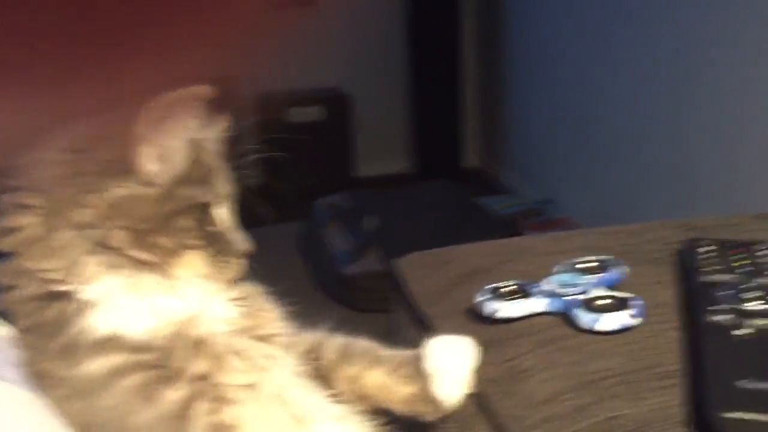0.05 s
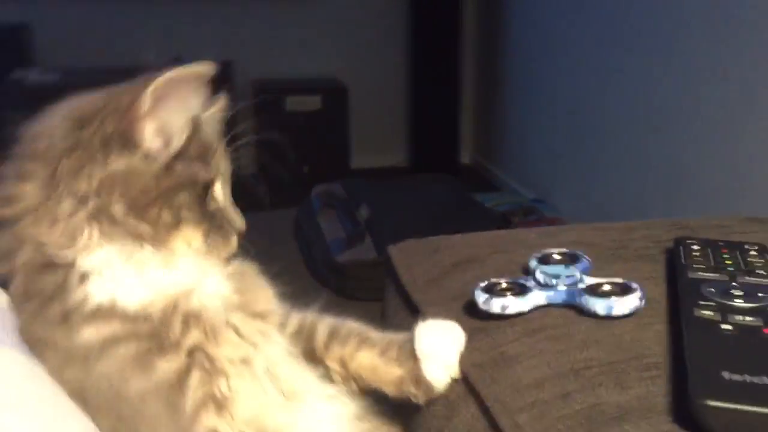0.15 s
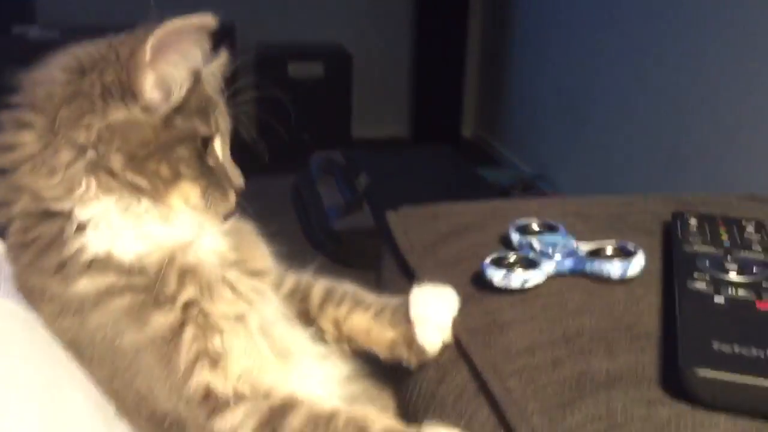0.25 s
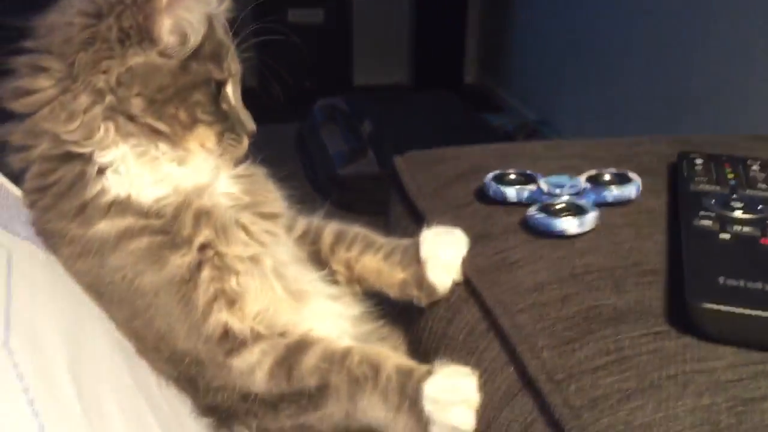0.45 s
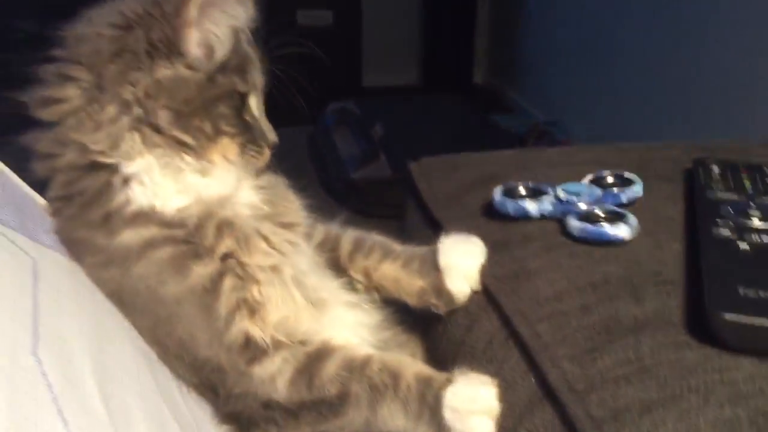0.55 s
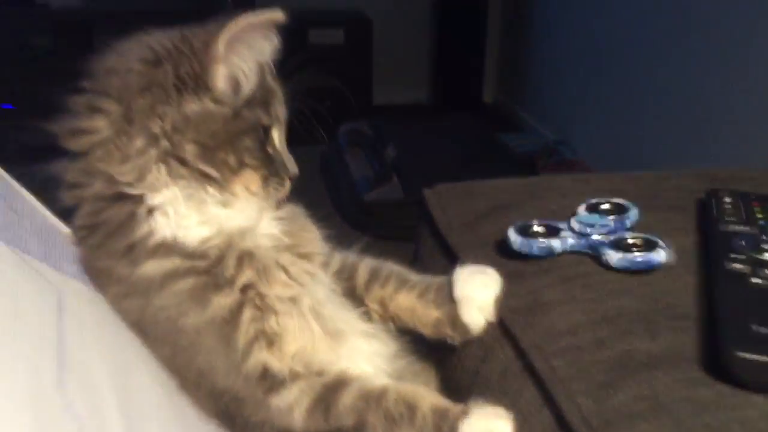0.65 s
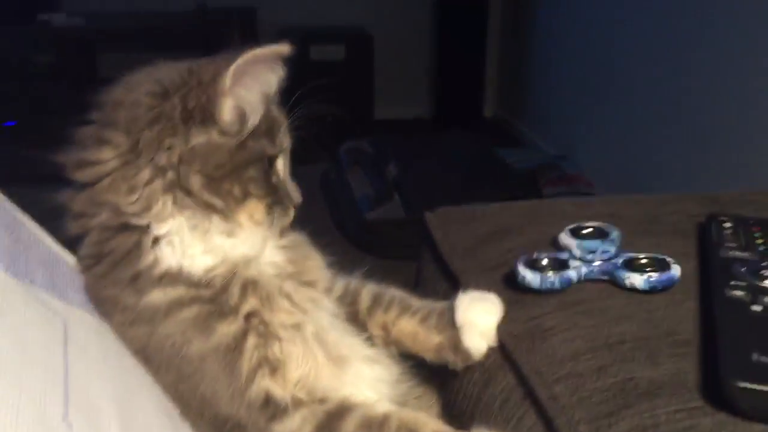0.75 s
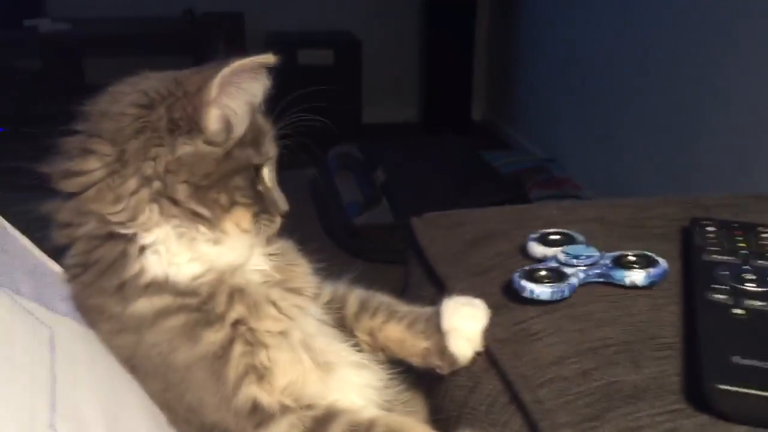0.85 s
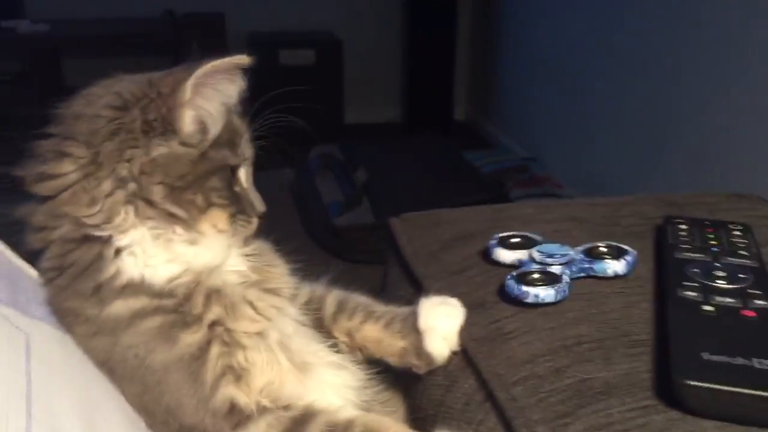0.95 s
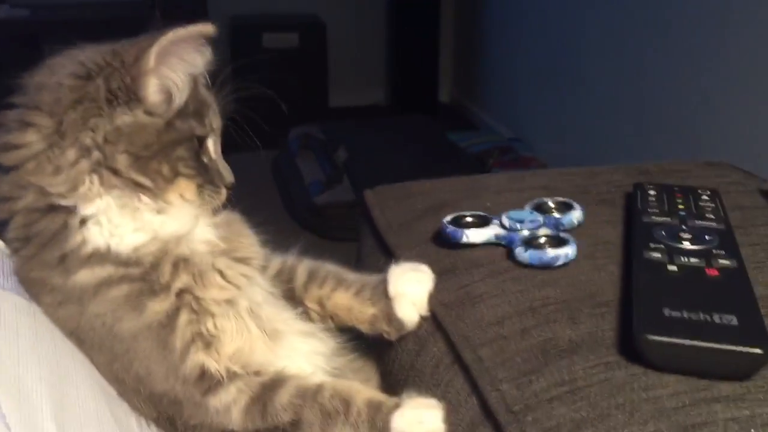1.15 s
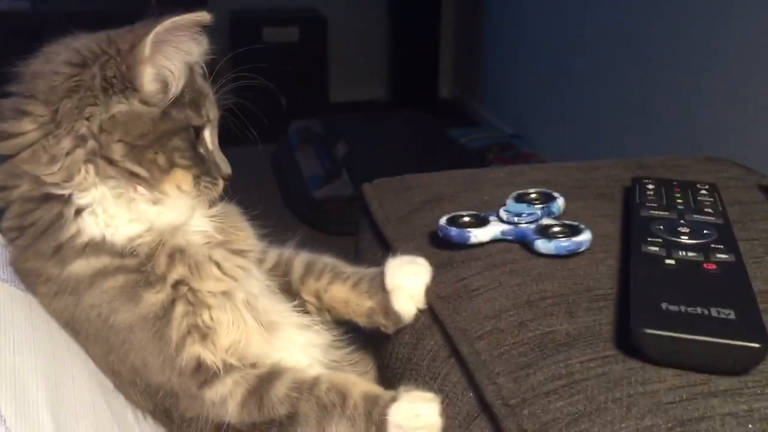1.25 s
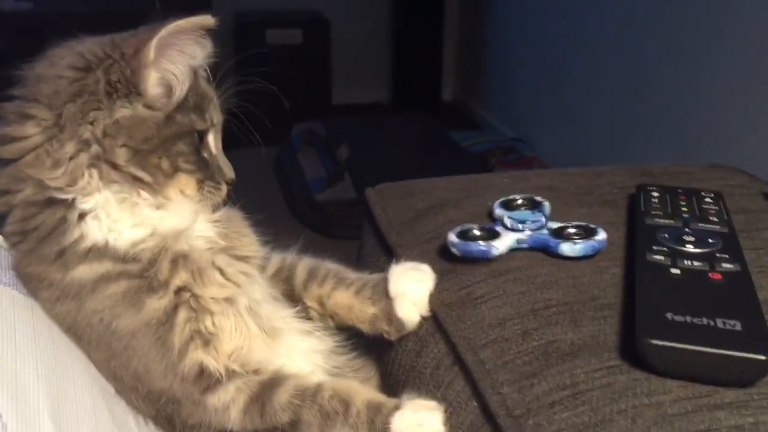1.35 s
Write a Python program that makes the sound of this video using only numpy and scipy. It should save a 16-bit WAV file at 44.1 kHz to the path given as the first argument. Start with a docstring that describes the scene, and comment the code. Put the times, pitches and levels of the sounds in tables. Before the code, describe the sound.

Two dry, close knocks come from fingers bumping a small hand-held case. The first, at about 0.25 seconds, is a quick cluster of contacts with a sharp tick and a low thud. The second, at about 0.8 seconds, is shorter and slightly softer. Skin rubs very faintly around both. There is almost no echo, and soft room hiss and low rumble continue throughout.

```python
"""Two dry, close knocks in a quiet room, most likely fingers bumping a small hand-held case.
Each knock is a quick cluster of contacts ringing well-damped modes, with light ticks on top
and low thuds as the case rocks in the grip.
Skin rubs faintly around the knocks; soft room rumble and hiss lie underneath."""
import sys
import numpy as np
from scipy import signal
from scipy.fft import rfft, irfft
from scipy.io import wavfile

SR = 44100
rng = np.random.default_rng(int(sys.argv[2]) if len(sys.argv) > 2 else 0)


def put_to_file(sound):
    """Save the sound as 16-bit audio at rate SR, in the file named by the first command-line argument."""
    columns = np.atleast_2d(sound).T  # one column per channel
    safe = np.clip(columns, -1, 1)
    whole_steps = np.round(safe * 32767)
    wavfile.write(sys.argv[1], SR, whole_steps.astype(np.int16))


N = 61739


def from_db(db):
    """Decibels to gain."""
    return 10 ** (np.asarray(db) / 20)


def unit_rms(x):
    """Scale to rms 1."""
    return x / np.sqrt(np.mean(x ** 2) + 1e-20)


def since(start_s):
    """Seconds since start_s, zero before it."""
    return np.maximum(np.arange(N) / SR - start_s, 0)


def decay(t, t60_s):
    """Exponential fall, 60 dB per t60_s."""
    return from_db(-60 * np.minimum(t / t60_s, 5))


def ring(t, pitch_hz, t60_s, swell_cycles=0.39):
    """Damped mode; builds over part of a cycle, so treble arrives first."""
    swell = 1 - np.exp(-t * pitch_hz / swell_cycles)
    return np.sin(2 * np.pi * pitch_hz * t) * swell * decay(t, t60_s)


def filtered(x, corner_hz, kind, order=2):
    """Causal low- or high-pass."""
    return signal.sosfilt(signal.butter(order, corner_hz, kind, fs=SR, output="sos"), x + 1e-18)


def coloured(noise, spectrum):
    """Shape noise to a spectrum; rms 1."""
    freq_hz, level_db = np.transpose(spectrum)
    bins_hz = np.maximum(np.fft.rfftfreq(N, 1 / SR), 1)
    gain = from_db(np.interp(np.log(bins_hz), np.log(freq_hz), level_db))
    return unit_rms(irfft(rfft(noise) * gain, N))


def room_noise(level_db=-66.5, rumble_hz=203, waver_db=2.5, waver_hz=8.6):
    """Steady hiss over a wavering low rumble."""
    # background spectrum: freq_hz, relative_db
    spectrum = [(15, -27), (25, -12), (48, 1.5), (82, -5), (111, -5.5), (142, -5), (246, -3), (332, -11.5),
                (476, -11.5), (531, -15.5), (871, -18.5), (1030, -13), (1470, -21.5), (2350, -21.5),
                (10400, -30.5), (16600, -33.5), (18000, -48)]
    noise = coloured(rng.standard_normal(N), spectrum)
    noise = from_db(level_db) * unit_rms(filtered(noise, 30, "high"))
    waver = unit_rms(filtered(rng.standard_normal(N), waver_hz, "low"))
    rumble = filtered(noise, rumble_hz, "low", order=1)
    return noise + rumble * (from_db(waver_db * waver) - 1)


def thuds():
    """The case rocks for a few cycles against the soft hand."""
    # rocking in the grip: start_s, level_db, pitch_hz, t60_s
    rocks = [(0.136, -50, 133.4, 0.13), (.143, -49.5, 245, 0.055), (0.189, -41, 168, 0.043),
             (.1952, -38, 72.7, 0.12), (0.2361, -23.5, 229.2, 0.046), (.2459, -21.5, 170, 0.033),
             (.2430, -28.5, 59.3, 0.082), (0.328, -51, 52.3, 0.19), (0.7717, -21, 146.5, 0.025),
             (0.7781, -29.5, 71.5, .085), (.986, -54, 250, 0.093), (1.229, -58, 71, 0.18)]
    return sum(from_db(level_db) * ring(since(start_s), pitch_hz, t60_s)
               for start_s, level_db, pitch_hz, t60_s in rocks)


def knocks():
    """Each contact rings the case; softer contacts lose treble, and the grip shifts the pitch."""
    # contacts on the case: start_s, gain_db, corner_hz, pitch_ratio
    contacts = [(.1711, -31, 2500, 1.12), (0.2305, -12.2, 7500, 0.97), (0.233, -16, 5130, 0.92),
                (0.2352, -5.5, 4500, 1.094), (0.239, 0, 2730, 1.05), (0.2427, -3.5, 1620, 0.801),
                (0.2509, 2.1, 13300, 1.033), (0.76, -29, 5000, 0.95), (0.7699, -2.5, 1850, 0.863),
                (0.7712, -5, 5100, .864), (0.7738, -6.5, 5240, 1.013)]
    # case modes: pitch_hz, level_db, t60_s
    modes = [(622.5, -25, 0.022), (734, -25, 0.012), (1155, -25, 0.011), (1905, -17, 0.0023),
             (2400, -23, 0.0049), (3710, -28, 0.0043), (4440, -24.5, 0.0031), (5450, -22.5, .0017),
             (7630, -32, 0.0013), (11600, -37, 0.00086)]
    out = np.zeros(N)
    for start_s, gain_db, corner_hz, pitch_ratio in contacts:
        t = since(start_s)
        ringing = sum(from_db(level_db) * ring(t, pitch_hz * pitch_ratio, t60_s)
                      for pitch_hz, level_db, t60_s in modes)
        out -= from_db(gain_db) * filtered(ringing, corner_hz, "low")  # minus: the case dents inward
    return out


def rubs(slips_per_s=7000, spread_db=4, low_cut_hz=150):
    """Dense tiny slips of skin, swelling and fading with each shift of the fingers."""
    # finger shifts: peak_s, level_db, rise_s, fall_s
    shifts = [(.176, -67.5, .004, 0.01), (.226, -62, 0.044, 0.0018), (0.235, -47, 0.0049, .003),
              (0.281, -63.5, 0.013, 0.013), (.342, -74.5, .008, 0.023), (.767, -58.5, 0.013, 0.0079),
              (0.78, -55, 0.0054, 0.011), (0.821, -70.5, 0.018, 0.018), (.96, -73.5, 0.034, 0.063)]
    # skin friction spectrum: freq_hz, relative_db
    spectrum = [(150, 0), (400, 3), (700, 1.5), (1500, -7), (3000, -9), (6000, -19.5), (10000, -21.5),
                (17000, -32)]
    t = np.arange(N) / SR
    envelope = sum(from_db(level_db) * np.exp(-np.maximum((peak_s - t) / rise_s, (t - peak_s) / fall_s))
                   for peak_s, level_db, rise_s, fall_s in shifts)
    slips = (rng.random(N) < slips_per_s / SR) * rng.choice([-1, 1], N)
    strength = from_db(spread_db * rng.standard_normal(N))
    return envelope * filtered(coloured(slips * strength, spectrum), low_cut_hz, "high")


def ticks(t60_s=0.0061, low_cut_hz=1300, high_cut_hz=9500):
    """Brief bright scratches, as of a nail grazing the case."""
    # grazes: start_s, level_db
    grazes = [(.2358, -44), (0.2397, -50), (0.2507, -35), (0.7601, -54), (0.77, -42), (0.7755, -56),
              (0.7776, -47.5)]
    envelope = sum(from_db(level_db) * decay(since(start_s), t60_s) * (since(start_s) > 0)
                   for start_s, level_db in grazes)
    scratches = filtered(envelope * rng.standard_normal(N), low_cut_hz, "high")
    return filtered(scratches, high_cut_hz, "low", order=1)


def room_tail(x, level_db=-21.5, t60_s=0.17, delay_s=0.0022):
    """Faint, short reverberation of a furnished room."""
    # tail spectrum: freq_hz, relative_db
    spectrum = [(60, -14), (300, -9), (800, -6), (2000, -1), (5000, 3), (16000, 6)]
    t = since(delay_s)
    tail = coloured(rng.standard_normal(N), spectrum) * (t > 0) * decay(t, t60_s)
    tail /= np.sqrt(np.sum(tail ** 2))
    return from_db(level_db) * signal.fftconvolve(x, tail)[:N]


def scene(low_cut_hz=21):
    """Handling sounds, their tail and the background; mono."""
    handling = thuds() + knocks() + rubs() + ticks()
    handling = filtered(handling, low_cut_hz, "high")  # the microphone loses the deepest bass
    return (room_noise() + handling + room_tail(handling))[None]


def record(dry, cutoff_hz=18500):
    """Steep elliptic low-pass."""
    return signal.sosfilt(signal.ellip(10, .1, 80, cutoff_hz, fs=SR, output="sos"), dry)


dry = scene()
out = record(dry)
put_to_file(out)
```